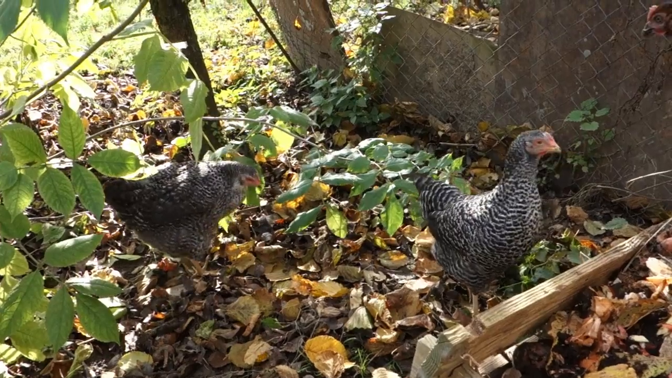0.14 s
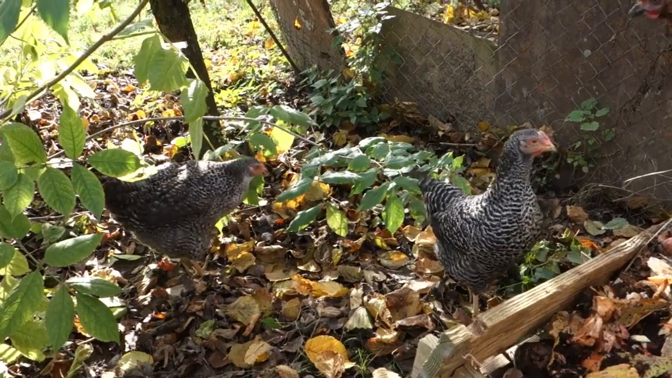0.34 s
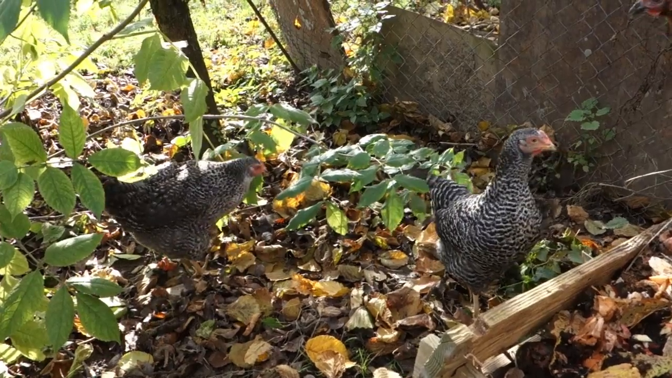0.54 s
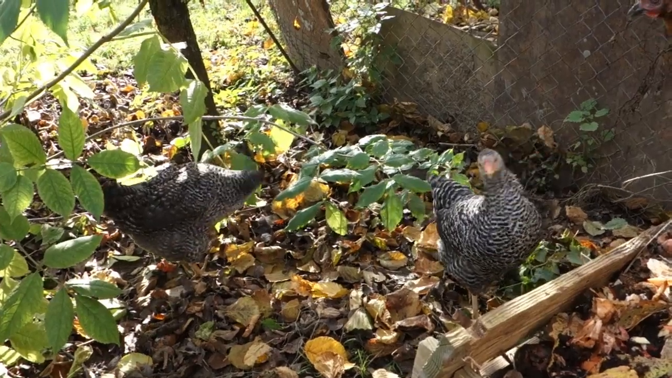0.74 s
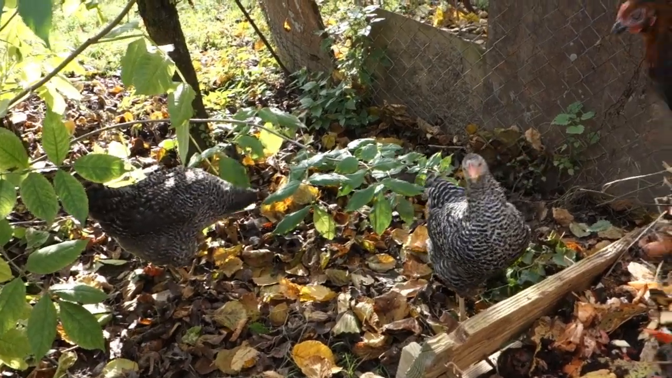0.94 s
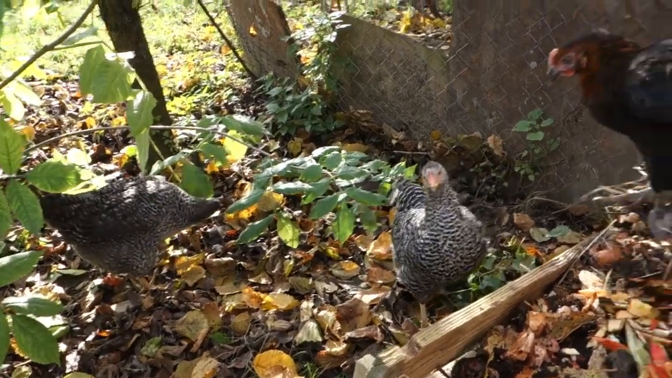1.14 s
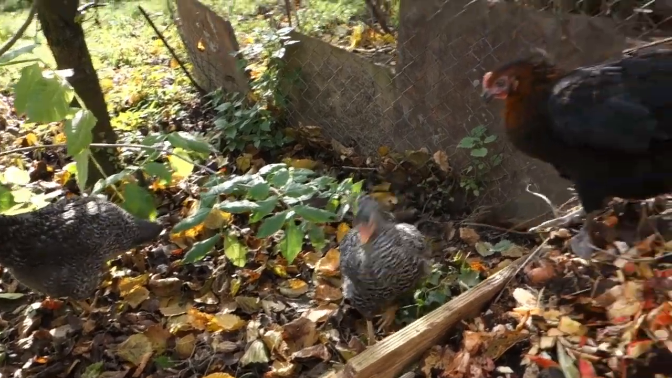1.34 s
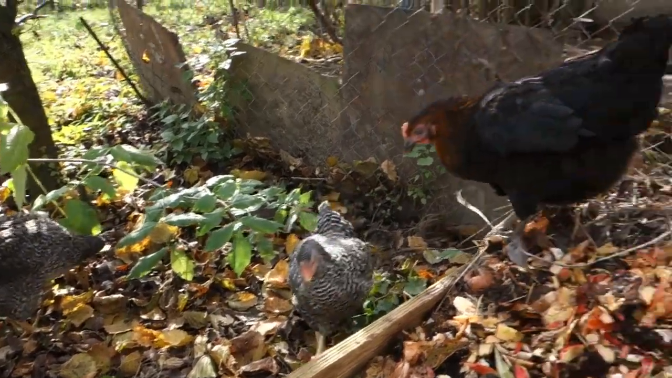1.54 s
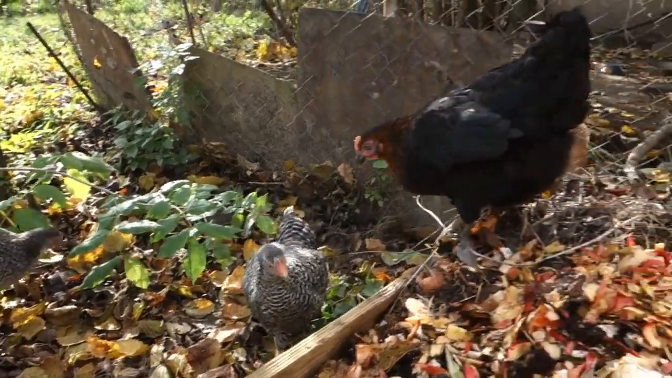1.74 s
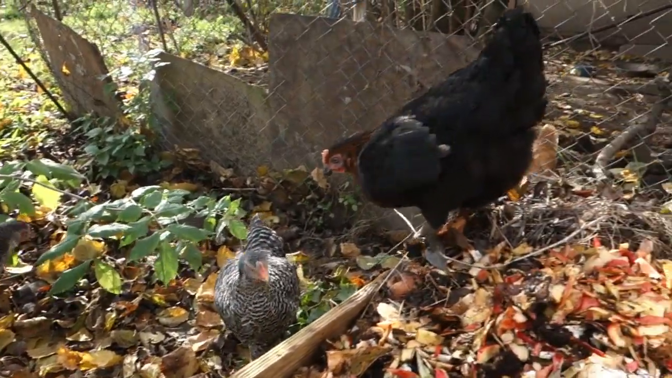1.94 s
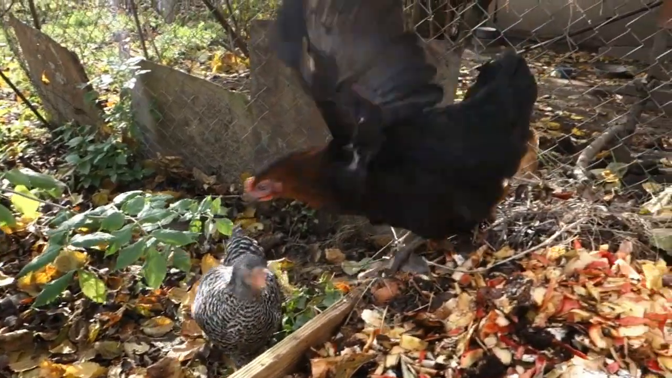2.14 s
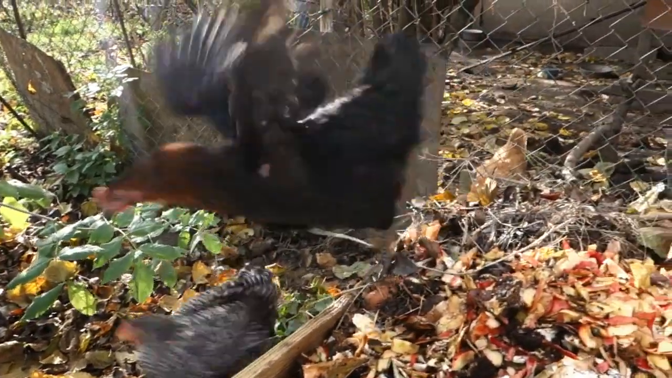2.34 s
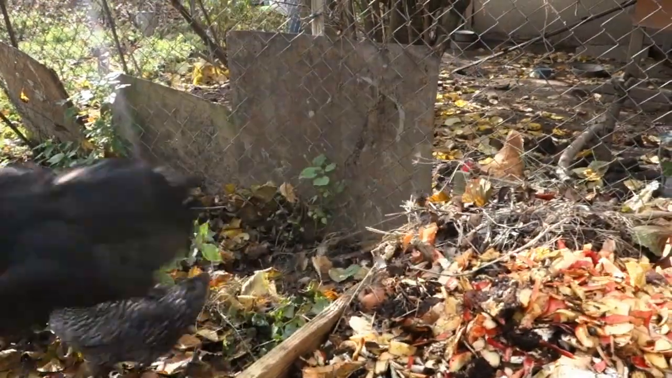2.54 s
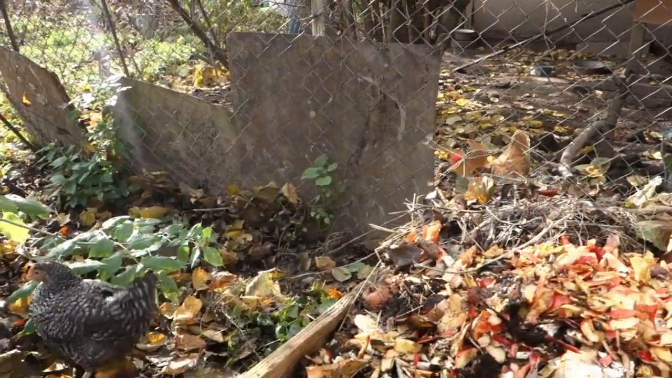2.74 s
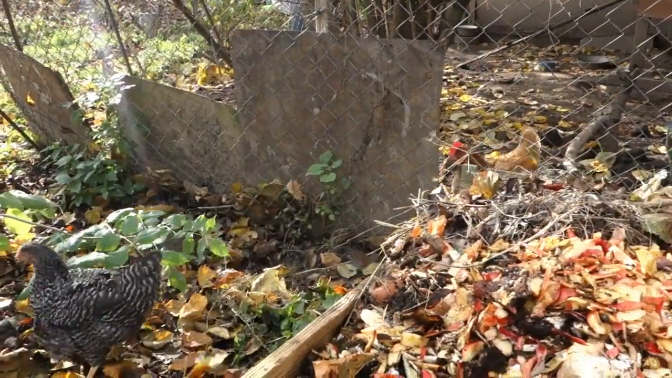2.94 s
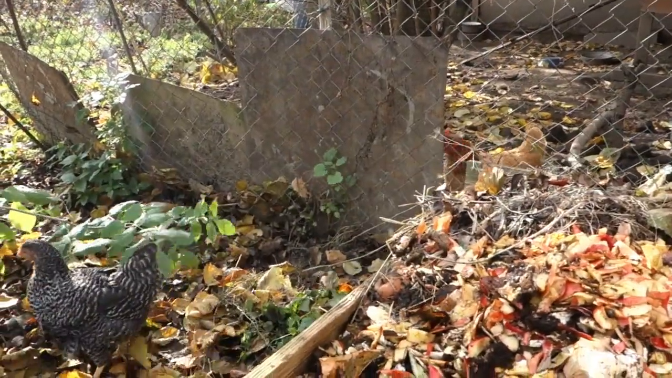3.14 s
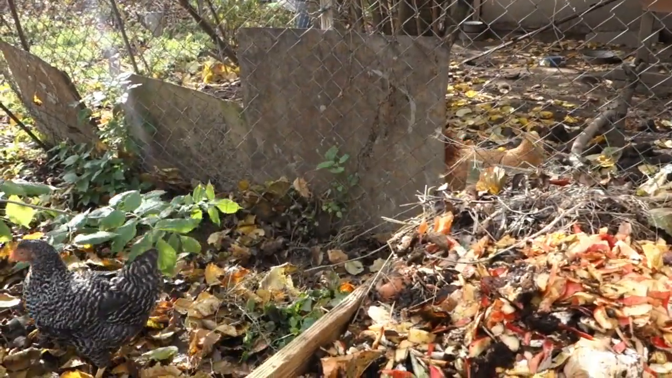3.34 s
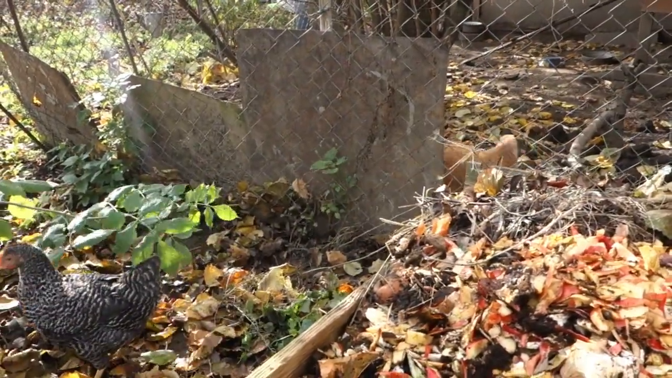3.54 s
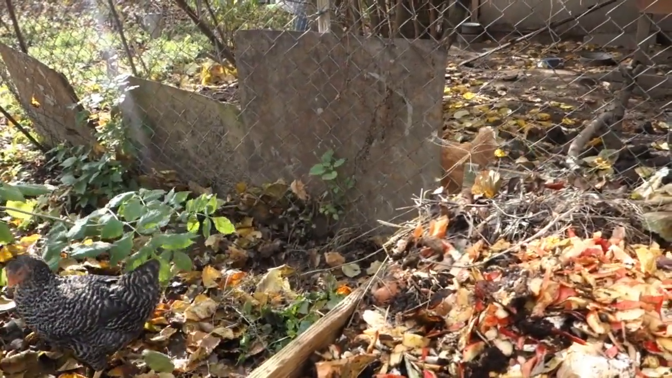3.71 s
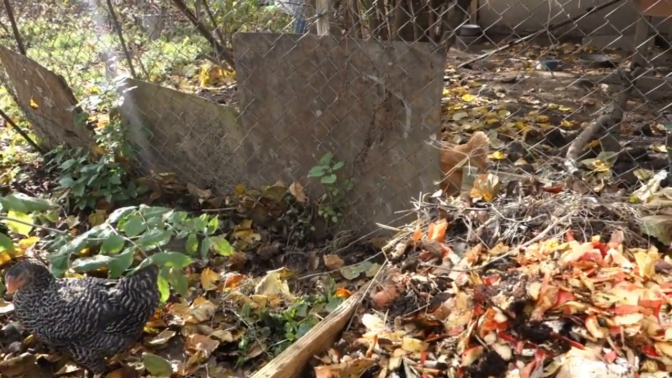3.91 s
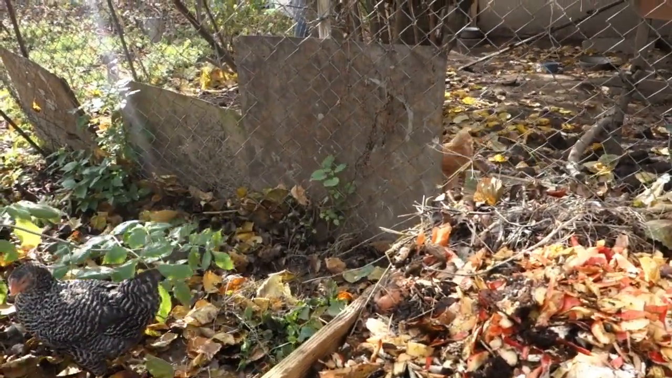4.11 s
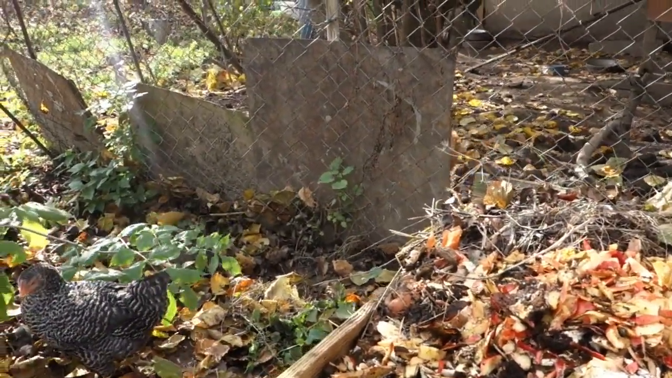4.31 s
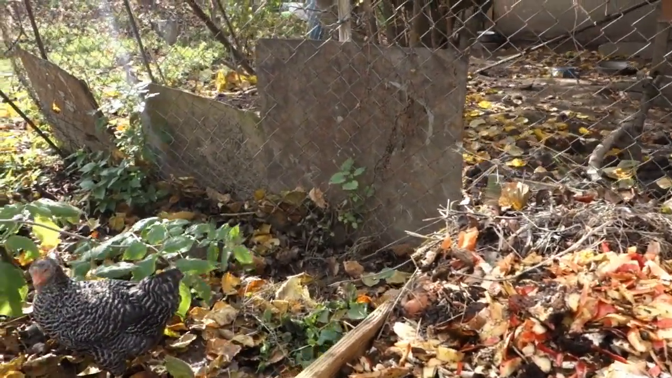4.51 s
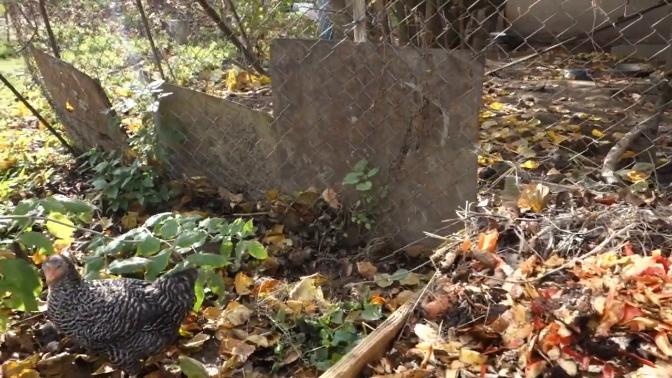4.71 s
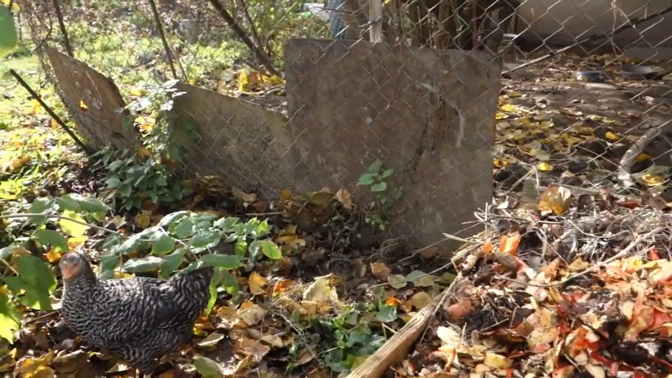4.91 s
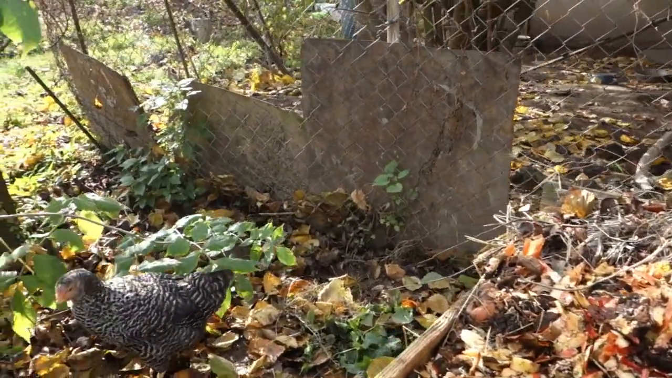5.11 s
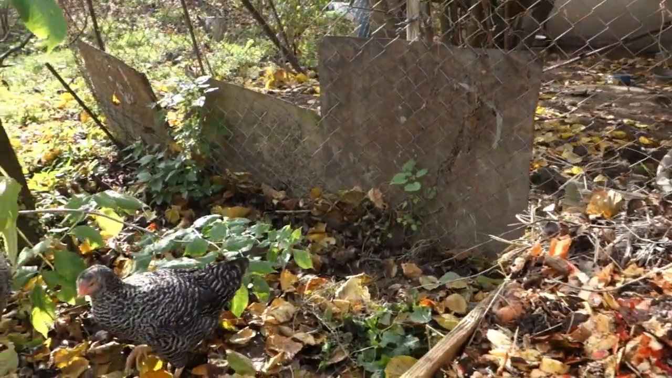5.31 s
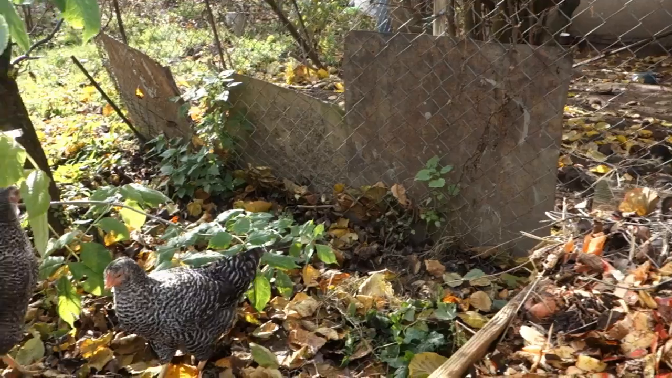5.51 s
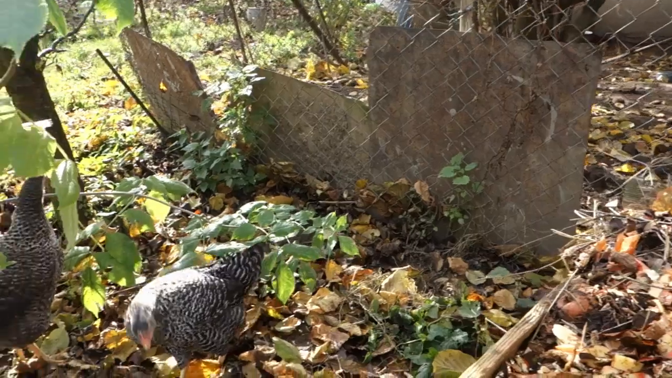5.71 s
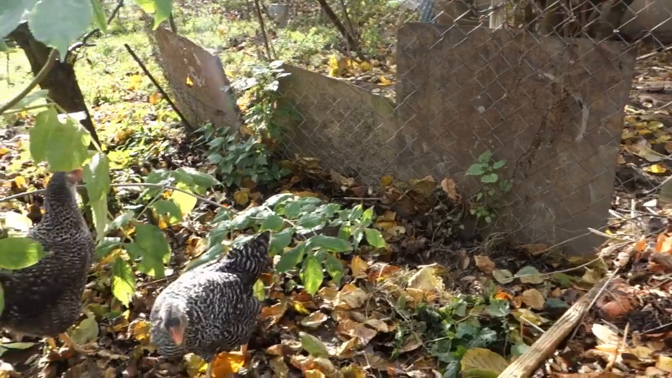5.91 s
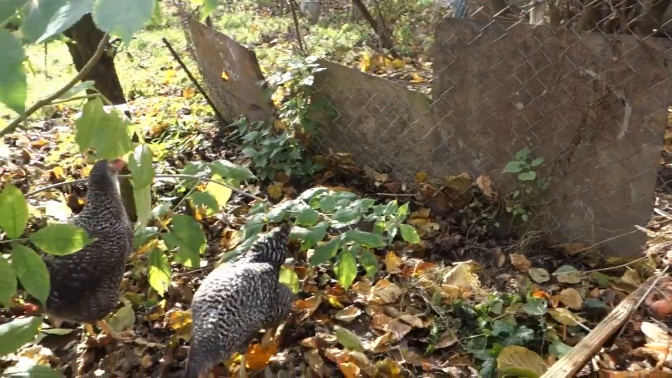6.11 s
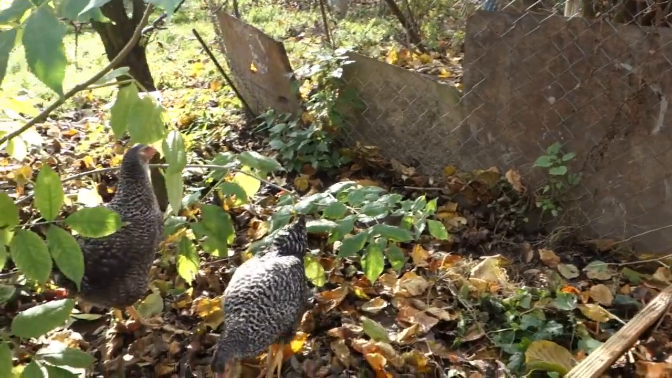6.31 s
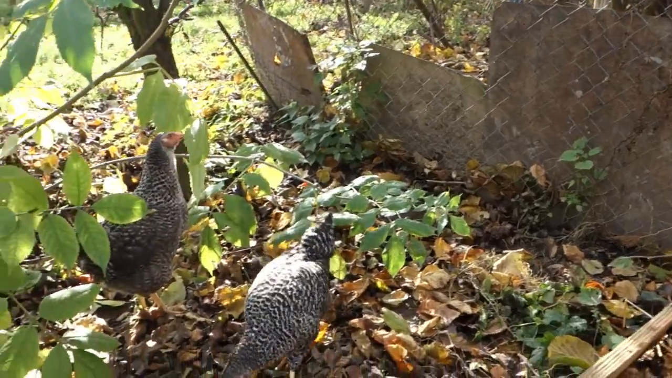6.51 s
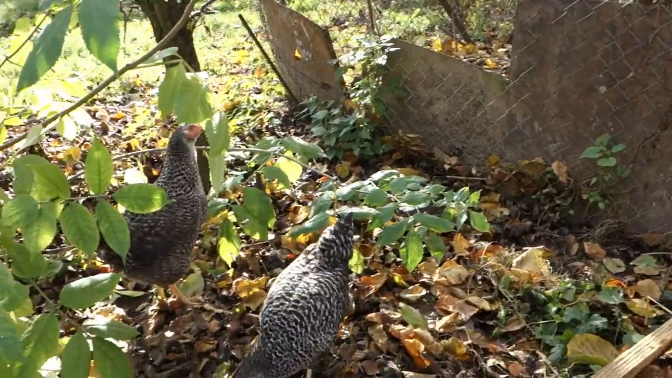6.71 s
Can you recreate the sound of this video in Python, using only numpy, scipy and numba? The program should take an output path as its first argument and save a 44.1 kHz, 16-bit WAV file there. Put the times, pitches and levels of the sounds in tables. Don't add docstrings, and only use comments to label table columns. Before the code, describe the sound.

Hens rustle and scratch through dry fallen leaves, then a sudden burst of flapping wings and crashing litter, settling back to light crackles.

```python
import sys
import numpy as np
from scipy import signal
from scipy.fft import rfft, irfft
from scipy.io import wavfile
from scipy.ndimage import uniform_filter1d
from numba import njit

SR = 44100
rng = np.random.default_rng(int(sys.argv[2]) if len(sys.argv) > 2 else 0)


def wav_record(signal):
    frames = np.transpose(np.atleast_2d(signal))
    bounded = np.clip(frames, -1, 1)
    quanta = np.round(bounded * 32767).astype(np.int16)
    wavfile.write(sys.argv[1], SR, quanta)


def magnitude_from_level(level_db):
    exponent = np.asarray(level_db, float) / 20
    return 10 ** exponent


N = 297858

# frequency in Hz, level in dB per Hz.
GARDEN_HZ_DB = [(15, -64), (25, -34), (54, -12), (92, -17.5), (170, -12.5), (229, -6), (344, -9),
                (440, -4.5), (540, -1.5), (960, -3.5), (1430, -7.5), (1900, -9.5), (2580, -15.5),
                (6780, -18.5), (11000, -18.5), (14300, -55), (22000, -120)]
# frequency in Hz, correlation from -1 to 1.
GARDEN_ALIKE = [(60, 0.87), (130, 0.94), (270, 0.82), (570, 0.78), (1220, 0.54), (2590, -0.2), (5490, -0.2),
                (11700, 0.023)]
# time in seconds, level in dB.
LORRY_DB = [
    (0, -78),
    (.1, -78),
    (.4, -75.5),
    (.7, -79),
    (.77, -100),
    (6.38, -100),
    (6.45, -76),
    (6.754, -95),
]
# time in seconds, level in dB.
TYRES_DB = [
    (0, -74),
    (1.1, -74.5),
    (1.55, -79),
    (1.8, -99),
    (6.3, -93),
    (6.754, -84),
]

# time in seconds, left minus right in dB in the treble,
# lead of the left port in microseconds.
HEN_PLACE = [(0, -4.5, -24), (.9, -11.5, -33), (1.4, -5, -15), (1.9, 0, -33), (2.3, -1.5, 13),
             (2.51, 1, 28), (2.6, 2, 35), (2.64, 1, 35), (2.676, 3, 45), (2.682, -4, 7), (2.72, 0.5, 40),
             (2.88, 2, 50), (3.5, 3, 55), (5, -3, 8), (5.7, 0.5, 36), (6.2, -3, 10), (6.754, 1, 16)]

# lowest Hz, highest Hz, ring in cycles, grains per second, size scatter in dB,
# share of the pan as a ratio.
AIR_GRAIN = (50, 174, 1.4, 350, 1.5, 0.5)
BODY_GRAIN = (291, 1088, 2.6, 1500, 2.35, 0.2)
STALK_GRAIN = (970, 2670, 1.47, 2500, 2.8, 0.85)
LEAF_GRAIN = (2764, 4300, 2.86, 4000, 2.1, 0.9)
EDGE_GRAIN = (4760, 12360, 2.26, 5060, 0.81, 1.455)
STEM_GRAIN = (2050, 2750, 7.3, 1200, 1.9, 0.7)

# time in seconds, moving litter in dB, weight of the bird pressing on it in dB.
STIRRING = [(0.0, -68, -67.5), (0.51, -77.5, -73), (1.16, -63, -66.5), (1.37, -59, -67), (1.94, -66, -64.5),
            (2.1, -61, -59), (2.18, -51.5, -59), (2.52, -48, -49.5), (2.69, -48.5, -45),
            (3.05, -52.5, -57.5), (3.31, -57.5, -60.5), (3.97, -73.5, -72.5), (4.98, -84, -74),
            (5.55, -64, -69.5), (5.64, -61, -62.5), (6.36, -70, -64), (6.75, -62, -68.5)]
# peak in seconds, rise in ms, fall in ms, body level in dB.
WING_BEATS = [(2.183, 5.3, 3.7, -48), (2.314, 40, 13, -55), (2.371, 12, 10, -46), (2.505, 2.5, 17, -34),
              (2.555, 10, 31, -45), (2.638, 5, 28, -35.5), (2.69, 6, 12, -38), (2.69, 96, 50, -41),
              (2.752, 6.9, 5, -40), (2.772, 12, 4, -37), (2.82, 28, 26, -43), (2.877, 3.5, 10, -43),
              (2.0, 36, 110, -66.5), (2.954, 12, 11, -50), (3.031, 20, 13, -55.5), (3.14, 26, 21, -60),
              (3.277, 11, 17, -57), (5.713, 13, 11, -56), (5.76, 9.5, 5.2, -57)]
# peak in seconds, rise in ms, fall in ms, level in dB.
STEM_DRAGS = [
    (6.04, 23, 30, -71),
    (6.16, 42, 20, -57.5),
    (6.9, 14, 8, -55),
    (6.225, 11, 7.4, -53),
    (5.55, 25, 41, -61),
]
# peak in seconds, rise in ms, fall in ms, leaf level in dB.
LEAF_BRUSHES = [(1.156, 6.1, 21, -56.5), (1.205, 26, 40, -57.5), (1.295, 7, 7.7, -58), (1.42, 32, 20, -58),
                (1.73, 5.4, 7.1, -57.5), (2.315, 4.2, 27, -55), (2.464, 4.2, 17, -48.5),
                (3.836, 8, 61, -68.5), (5.317, 8, 4, -60.5), (5.836, 5.3, 5.5, -55), (6.323, 8.7, 10, -62)]
# peak in seconds, rise in ms, fall in ms, leaf level in dB.
CLAW_RAKES = [(0.916, 8.6, 24, -63.5), (1.458, 17, 11, -54.5), (1.544, 8.4, 13.7, -43.5),
              (1.603, 3, 22, -51.5), (2.0, 44, 26, -56), (2.059, 34, 12, -49), (2.119, 3, 10, -55),
              (2.136, 5.6, 18, -48.5), (2.187, 4, 10, -56), (2.229, 6.3, 6, -58), (5.123, 35, 18, -58),
              (5.179, 8.4, 7, -62.5), (5.232, 10, 30, -62), (5.504, 16, 28, -61.5), (5.57, 4.8, 10, -54.5),
              (5.595, 8, 6.8, -57.5), (6.152, 13, 13, -60.5)]
# peak in seconds, rise in ms, fall in ms, leaf level in dB.
LITTER_CRUSHES = [(1.849, 5.5, 4.8, -58.5), (2.26, 15, 9.7, -51), (2.395, 25, 12, -46.5),
                  (2.505, 2, 15, -40), (2.554, 36, 18, -46), (2.597, 10, 47, -39), (2.96, 10, 4.9, -50),
                  (3.044, 26, 10, -46.5), (3.149, 16, 23, -48.5), (3.271, 18, 67, -54.5),
                  (3.37, 9.4, 28, -57.5), (3.547, 8.1, 14, -56), (3.579, 13, 14, -56),
                  (3.648, 12, 17, -58.5), (5.372, 5.3, 12, -62.5), (5.63, 50, 29, -56),
                  (5.673, 15, 38, -52), (5.709, 2, 6.8, -56), (5.757, 5.1, 8.3, -52),
                  (5.912, 4.8, 4.3, -61.5), (6.045, 31, 18, -61.5), (6.093, 5.8, 15, -61.5),
                  (6.226, 20, 13.5, -56.5), (6.464, 14, 46, -58.5), (6.578, 16, 26, -62)]
# peak in seconds, rise in ms, fall in ms, leaf level in dB.
SCRAP_SIFTS = [
    (0.868, 38, 19, -69),
    (3.091, 8.5, 9.5, -53.5),
    (3.615, 8, 8.7, -64),
    (3.721, 12, 19, -64),
    (4.155, 7, 25, -74),
    (4.349, 29, 25, -73),
    (4.551, 11, 9, -75),
    (4.687, 13, 15, -70.5),
    (4.88, 9, 7, -74),
]
# peak in seconds, rise in ms, fall in ms, leaf level in dB.
STALK_SLAMS = [
    (2.633, 3.5, 8.6, -36.5),
    (2.678, 6.4, 8.4, -33.5),
    (2.76, 5.3, 9, -38.5),
    (2.879, 13, 7.8, -41),
]
# edge over leaf in dB, stalk over leaf in dB.
GESTURE_COLOURS = [
    (-1, -9),
    (2.5, -23),
    (4, -0.5),
    (8.5, -1.5),
    (3.5, 4),
]

# start in seconds, ring in Hz, leaf in dB, edge in dB, knock in dB.
LONE_SNAPS = [(2.1337, 2100, -33, -31, -32), (2.1792, 2870, -31, -37.5, -43), (2.5052, 4050, -26, -37, -35),
              (2.508, 3160, -30, -37, -31), (2.5166, 3100, -13, -21, -37), (2.5176, 1580, -24.5, -30, -30),
              (2.521, 3320, -22, -32, -39), (2.5247, 3560, -21, -34, -46), (2.5552, 2006, -26.5, -38, -27),
              (2.6328, 3080, -18, -23, -2.5), (2.6382, 2700, -25, -36, -40), (2.6705, 1950, -27, -17, -7),
              (2.676, 2020, -24, -14, -23), (2.6803, 2920, -26, -26, -22), (2.6826, 2000, -33, -35, -36),
              (2.7583, 2320, -21, -30, -17), (2.7625, 3100, -24, -28, -34), (2.77, 2430, -29, -31, -38),
              (2.8482, 1700, -31, -48, -13.5), (2.8615, 2020, -35, -41, -34), (2.8777, 2100, -22, -28, -31),
              (3.014, 5430, -24, -44, -45), (3.1415, 1970, -30, -48, -39), (3.1627, 5210, -28, -28, -50)]
# start in seconds, pitch in Hz, ring in cycles, level in dB.
TWIG_RINGS = [(2.175, 293.5, 2.4, -53), (2.632, 556, 2.6, -29), (2.6337, 800, 1.1, -17),
              (2.6788, 560, 0.7, -7), (2.7621, 800, 1.3, -18), (2.6595, 700, 1.3, -21),
              (2.6706, 2620, 0.23, 4), (2.676, 3020, 0.28, 3), (2.679, 2400, 0.4, -10),
              (2.6794, 2400, 0.4, -7), (2.6828, 1500, 0.4, -8), (2.674, 207.6, 5.7, -35.5),
              (2.691, 325, 2.6, -26.5), (2.87, 202, 3.3, -44.5), (2.7575, 756, 4.6, -21.5),
              (2.872, 634, 5, -37.5), (5.6675, 1380, 2.8, -34.5), (5.6697, 1600, 2.6, -35),
              (3.83, 3950, 60, -60), (3.84, 3250, 60, -62), (5.689, 775, 2.1, -40.5),
              (6.142, 2700, 30, -55), (6.157, 2320, 30, -56), (6.197, 2450, 25, -54),
              (6.213, 1140, 5.6, -45), (6.214, 2240, 24, -51), (6.222, 2030, 17.6, -49)]
# start in seconds, ring in Hz, level in dB.
LEAF_TICKS = [(0.135, 3200, -46), (0.1878, 4100, -44), (0.8687, 3320, -43.5), (1.1242, 4350, -45),
              (1.1494, 3630, -41), (1.2024, 3920, -36.5), (1.2323, 3700, -37.5), (1.2558, 4440, -43),
              (1.6803, 3800, -39), (1.7804, 5397, -35.5), (1.8488, 3150, -33.5), (1.8527, 3080, -36),
              (1.931, 3160, -36), (2.0105, 3320, -33), (2.0596, 3970, -30), (2.1374, 4780, -27.5),
              (2.3876, 4400, -29), (2.9635, 3190, -31), (3.6508, 2890, -32), (5.5001, 2970, -39),
              (5.5905, 3920, -34), (5.8101, 3100, -32), (6.4596, 5000, -32)]
# start in seconds, ring in Hz, level in dB.
LEAF_BREAKS = [(0.068, 4060, -45), (0.5028, 3400, -51.5), (0.9156, 3200, -47), (1.2152, 2818, -41),
               (1.4551, 3190, -36), (1.5127, 5170, -37), (1.6414, 3259, -38), (1.7765, 3450, -38.5),
               (1.9681, 4310, -38), (1.9887, 3800, -31), (2.0024, 3570, -31), (2.0178, 4088, -28),
               (2.4628, 3083, -28.5), (3.5761, 3320, -39), (5.6722, 2560, -32.5), (5.707, 4440, -25.5),
               (5.7094, 2667, -31), (5.7116, 3800, -32), (6.242, 4090, -43), (6.5554, 2520, -52)]
# start in seconds, ring in Hz, level in dB.
LEAF_PINGS = [
    (1.34, 3500, -27),
    (1.3749, 3540, -23.5),
    (1.5072, 3630, -34),
    (2.3122, 4000, -24),
    (2.3954, 4130, -21),
    (6.6238, 3400, -40),
    (1.6042, 3231, -29.5),
    (2.1565, 4000, -34),
]
# start in seconds, level in dB.
EDGE_SPITS = [(0.0116, -37), (0.0163, -36), (0.4256, -53), (0.7013, -45), (1.0864, -51), (1.267, -46),
              (1.4261, -42), (1.5054, -37), (1.5368, -32), (1.5527, -31), (1.5766, -35), (1.6, -34),
              (1.62, -35), (1.632, -35), (2.2438, -35), (3.0417, -25), (5.568, -47), (5.6706, -35),
              (5.761, -34), (6.6434, -42), (6.6481, -27), (6.6662, -34.5), (6.7055, -49)]
# start in seconds, pitch in Hz,
# level in dB.
LITTER_CHIPS = [(0.0172, 3200, -45), (1.1546, 3400, -38.5), (1.172, 3600, -43), (1.176, 3400, -41),
                (1.186, 3700, -44), (1.2051, 9600, -39.5), (1.2937, 5800, -47), (1.3295, 3200, -49),
                (1.4655, 8500, -34), (1.4662, 3300, -39), (1.4762, 8300, -41), (1.4986, 3300, -44),
                (1.5236, 6000, -43), (1.5417, 5500, -27), (1.5413, 10600, -28), (1.5813, 8500, -38),
                (1.7731, 7000, -41), (1.9391, 3500, -44), (1.9488, 3500, -45), (2.0249, 1900, -43),
                (2.0313, 800, -42), (2.116, 7000, -41), (2.1859, 7000, -36), (2.23, 7000, -36),
                (2.3296, 7000, -38), (2.3524, 800, -34.5), (2.4087, 800, -35.5), (2.4134, 1800, -40),
                (2.4623, 1800, -41), (2.4774, 3500, -33), (2.5556, 6900, -27), (2.5578, 800, -27),
                (2.5727, 4300, -26), (2.7688, 5000, -27), (2.8315, 1500, -35), (2.861, 1800, -27),
                (2.9907, 800, -37.5), (3.042, 3300, -35), (3.1387, 6500, -41), (3.164, 800, -38.5),
                (3.5501, 1800, -46), (3.563, 1800, -44), (5.6377, 3800, -42), (5.6602, 7400, -42),
                (5.6725, 6500, -33), (5.7071, 1710, -35), (5.7125, 1700, -37), (5.7645, 1900, -41),
                (6.0535, 3500, -43), (6.1217, 6500, -46), (6.1231, 3500, -43), (6.1616, 1900, -46),
                (6.1721, 7000, -50), (6.244, 3500, -39), (6.4487, 7000, -44), (6.5048, 7000, -43),
                (6.5555, 7500, -44), (6.5747, 7000, -44),
                (0.0577, 1400, -54), (0.0663, 1400, -48), (1.3847, 3300, -41), (1.5463, 9500, -32),
               (1.5499, 9500, -36), (1.5739, 6000, -38), (1.5484, 3200, -32), (1.531, 3600, -34),
               (1.9888, 6500, -31), (1.9944, 3500, -43), (2.0256, 6500, -36), (2.0344, 6000, -37),
               (2.0465, 6500, -36), (2.075, 6500, -38), (2.124, 3700, -38), (2.1466, 6500, -34),
               (2.1534, 6500, -36), (2.2504, 6500, -33), (2.2825, 6000, -36), (2.323, 6300, -34),
               (2.4015, 6300, -31), (2.496, 596, -30), (2.6038, 9300, -28), (2.6056, 9800, -25),
               (2.696, 9300, -31), (2.7552, 9000, -33), (2.7655, 800, -24), (2.7691, 900, -29),
               (2.7717, 1300, -28), (2.7745, 706, -30), (2.7823, 9300, -40), (2.8455, 9300, -39),
               (2.8747, 1570, -23), (2.878, 650, -30), (2.947, 3000, -41), (2.9494, 1400, -39),
               (3.0321, 6300, -36), (3.046, 6300, -31), (3.091, 6300, -31), (3.1683, 6300, -35),
               (3.557, 595, -48), (3.619, 3300, -44), (3.6439, 3300, -43), (3.6466, 3300, -43),
               (5.099, 1500, -47), (5.5665, 9800, -29.5), (5.5719, 9300, -37), (5.597, 3700, -37),
               (5.6776, 9300, -38), (5.7, 3000, -36), (5.833, 594, -45), (5.8716, 1500, -48),
               (6.0206, 3500, -44), (6.024, 3500, -42), (6.059, 3400, -41), (6.2262, 2430, -36),
               (6.2426, 750, -43), (6.4526, 3500, -44), (6.4814, 3500, -46), (6.654, 9500, -42)]


def level(x, db):
    return x * magnitude_from_level(db) / np.sqrt(np.mean(x ** 2))


def high(x, hz, order):
    return signal.sosfilt(signal.butter(order, hz, "high", fs=SR, output="sos"), x)


def noise_band(low_hz, high_hz):
    band = signal.butter(2, (low_hz, high_hz), "band", fs=SR, output="sos")
    return signal.sosfilt(band, rng.standard_normal(N))


def garden():
    log_hz = np.log(np.arange(N // 2 + 1) * SR / N + 1)
    hz, db = np.transpose(GARDEN_HZ_DB)
    colour = magnitude_from_level(np.interp(log_hz, np.log(hz), db))
    hz, likeness = np.transpose(GARDEN_ALIKE)
    alike = np.clip(np.interp(log_hz, np.log(hz), likeness), -.9, .99)
    noise = rfft(rng.standard_normal((2, N)))
    mid, side = noise * colour * np.sqrt([1 + alike, 1 - alike])
    steps = np.repeat(rng.standard_normal(N // 4000 + 1), 4000)[:N]
    swell = uniform_filter1d(steps, size=6000)
    gain_db = -61 - 20 * np.log10(np.std(irfft(mid, N)))
    return irfft(np.array([mid + side, mid - side]), N) * magnitude_from_level(gain_db + .6 * swell)


def lorry():
    t = np.arange(N) / SR
    wobble = uniform_filter1d(rng.standard_normal(N), size=4000) * 60
    drone_hz = 66 + 1.52 * wobble
    drone = np.sin(2 * np.pi * np.cumsum(drone_hz) / SR)
    engine = level(drone, -1.8) + level(noise_band(72, 125), -5.5)
    tyres = level(noise_band(195, 256), -0.71) + level(noise_band(740, 1100), 1.5)
    engine_gain = magnitude_from_level(np.interp(t, *np.transpose(LORRY_DB)))
    tyre_gain = magnitude_from_level(np.interp(t, *np.transpose(TYRES_DB)))
    return engine * engine_gain + tyres * tyre_gain


@njit
def rings(start, hz, damp, size, n):
    out = np.zeros((2, n))
    for g in range(len(hz)):
        turn = np.exp((2j * np.pi * hz[g] - damp[g]) / SR)
        onset = np.exp(-6. * hz[g] / SR)
        for c in range(2):
            i = int(start[c, g]) + 1
            late = i - start[c, g]
            z = size[c, g] * turn ** late
            rest = onset ** late
            for k in range(i, min(n, i + int(6 * SR / damp[g]))):
                out[c, k] += z.imag * (1 - rest)
                z = z * turn
                rest = rest * onset
    return out


def hen_pan_db(s):
    at, pan_db, _ = np.transpose(HEN_PLACE)
    return np.interp(s, at, pan_db)


def placed(s, hz, cycles, size, pan_db, spread_us):
    at, _, lead_us = np.transpose(HEN_PLACE)
    lead = (np.interp(s, at, lead_us) + spread_us) * SR / 1e6
    start = np.maximum(s * SR + np.array([-lead, lead]) / 2, 0)
    port_size = size * magnitude_from_level(np.array([pan_db, -pan_db]) / 2)
    return rings(start, np.minimum(hz, .4 * SR), hz / cycles, port_size, N)


def swells(s, at, rise_ms, fall_ms, db):
    since_ms = (s[:, None] - at) * 1000
    rise = 0.73 * (since_ms / rise_ms) ** 2
    fall = 1.014 * np.abs(since_ms / fall_ms) ** 1.14
    shape = np.where(since_ms < 0, rise, fall)
    return (magnitude_from_level(2 * db) * np.exp(-shape)).sum(axis=1)


def swarm(power, low_hz, high_hz, cycles, rate, scatter_db, pan_share):
    chance = rng.random((40000, 4)).T
    spread = rng.standard_normal((40000, 2)).T
    mean_gap_s = max(1 / rate, N / SR / 39000)
    s = np.cumsum(-np.log(1 - chance[0])) * mean_gap_s
    keep = s < N / SR
    s, chance, spread = s[keep], chance[:, keep], spread[:, keep]
    hz = low_hz * (high_hz / low_hz) ** chance[1]
    sign = np.sign(chance[3] - .5)
    size = magnitude_from_level(scatter_db * np.minimum(-np.log(1 - chance[2]), 3.2)) * sign
    grid = np.arange(0, N, 44) / SR
    wanted = np.interp(s, grid, power(grid))
    size *= np.sqrt(wanted * 4 * hz / cycles / rate / np.mean(size ** 2)) * magnitude_from_level(-1.0)
    pan_db = pan_share * (hen_pan_db(s) + 8.3 * spread[0])
    size *= magnitude_from_level(1.5) / np.sqrt((magnitude_from_level(pan_db) + magnitude_from_level(-pan_db)) / 2)
    return placed(s, hz, cycles, size, pan_db, 12 * spread[1])


def wing_air():
    s, rise_ms, fall_ms, body_db = np.transpose(WING_BEATS)
    return swarm(lambda t: swells(t, s, 1.2 * rise_ms, 0.89 * fall_ms, body_db - 23), *AIR_GRAIN)


def chips():
    s, hz, db = np.transpose(LITTER_CHIPS)
    ring_ms = 0.42
    cycles = 1.3 + hz * ring_ms / 1e3
    return placed(s, hz, cycles, magnitude_from_level(db), 0.97 * hen_pan_db(s), 0)


def twigs():
    s, hz, cycles, db = np.transpose(TWIG_RINGS)
    return placed(s, hz, cycles, magnitude_from_level(db), .6 * hen_pan_db(s), 0)


def crack(s, hz, leaf_db, edge_db, top_db=0, splinter_db=0):
    chance = rng.random((len(s), 8)).T
    pan_db = 1.8 * hen_pan_db(s) + 4.0 * (chance[1] - .5)
    out = placed(s, hz, 1.42, magnitude_from_level(leaf_db + 1.0), pan_db, 0)
    out -= placed(s, 6000 + 1200 * chance[0], 3.7, magnitude_from_level(edge_db - 1.0), pan_db, 0)
    out += placed(s, 10800 - 1500 * chance[0], 2.6, magnitude_from_level(edge_db + top_db + 3.5), pan_db, 0)
    for late, tone in chance[2:].reshape(3, 2, -1):
        splinter_s = s + .0008 + .006 * late
        splinter_hz = hz * (.8 + .8 * tone)
        size = magnitude_from_level(leaf_db + splinter_db - 11 - 9 * late)
        out += placed(splinter_s, splinter_hz, 3.5, size, pan_db, 0)
    return out


def ticks():
    leaves = 0
    for rows, edge_db, top_db in ((LEAF_TICKS, -10.5, 0), (LEAF_BREAKS, -3.5, 0), (LEAF_PINGS, -12, -7)):
        s, hz, db = np.transpose(rows)
        leaves = leaves + crack(s, hz, db, db + edge_db, top_db, top_db / 2)
    s, db = np.transpose(EDGE_SPITS)
    spits = crack(s, np.full(len(s), 5800.0), db - 11, db)
    return high(leaves, 2600, order=8) + high(spits, 4600, order=5)


def snaps():
    s, hz, leaf_db, edge_db, knock_db = np.transpose(LONE_SNAPS)
    knock_hz = 900 + 600 * rng.random(len(s))
    knock = placed(s, knock_hz, 0.41, magnitude_from_level(knock_db - 4.5), .6 * hen_pan_db(s), 0)
    return crack(s, hz, leaf_db, edge_db) + knock


def rustle():
    at, litter_db, weight_db = np.transpose(STIRRING)
    kinds = (LEAF_BRUSHES, CLAW_RAKES, LITTER_CRUSHES, SCRAP_SIFTS, STALK_SLAMS)
    s, rise_ms, fall_ms, leaf_db = np.vstack(kinds).T
    edge_db, stalk_db = np.repeat(GESTURE_COLOURS, [len(k) for k in kinds], axis=0).T

    def stir(t, db):
        return magnitude_from_level(2 * np.interp(t, at, db))

    def gestures(t, db):
        return swells(t, s, rise_ms, fall_ms, db)

    body = swarm(lambda t: stir(t, weight_db - 6.5) + swells(t, *np.transpose(WING_BEATS)), *BODY_GRAIN)
    stalk = swarm(lambda t: stir(t, weight_db) + gestures(t, leaf_db + stalk_db), *STALK_GRAIN)
    leaf = swarm(lambda t: stir(t, litter_db - 5) + gestures(t, leaf_db), *LEAF_GRAIN)
    edge = swarm(lambda t: stir(t, litter_db) + gestures(t, leaf_db + edge_db), *EDGE_GRAIN)
    stem = swarm(lambda t: swells(t, *np.transpose(STEM_DRAGS)), *STEM_GRAIN)
    return body + stalk + high(leaf, 2350, order=4) + edge + stem


def scene():
    hens = high(rustle() + snaps() + ticks() + twigs() + chips(), 170, order=3)
    echo_s = .0042
    fence = magnitude_from_level(-16.0) * np.roll(hens[::-1], int(echo_s * SR), axis=1)
    return hens + wing_air() + fence + garden() + lorry()


def roll_off(x):
    return signal.sosfilt(signal.butter(12, 11800, fs=SR, output="sos"), x)


def record(dry):
    thin = high(dry, 30, order=2)
    top_cut = signal.ellip(12, .3, 52, 11060, fs=SR, output="sos")
    leak = magnitude_from_level(-33) * high(thin, 11500, order=8)
    mix = signal.sosfilt(top_cut, thin) + leak
    return roll_off(mix)


dry = scene()
out = record(dry)
wav_record(out)
```